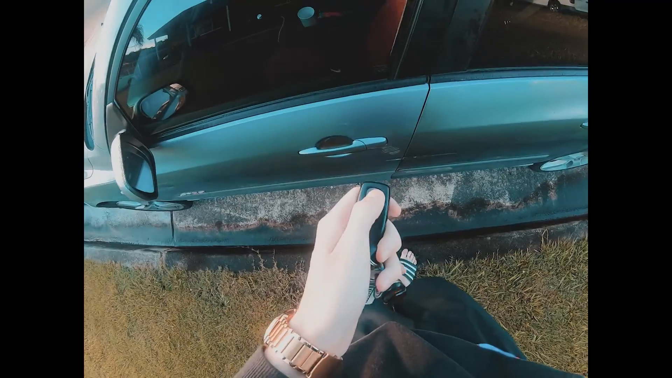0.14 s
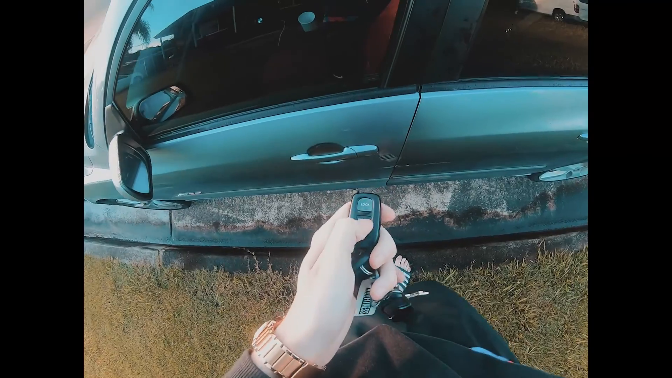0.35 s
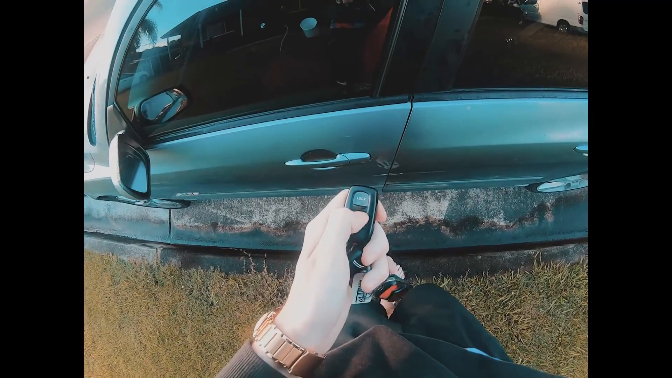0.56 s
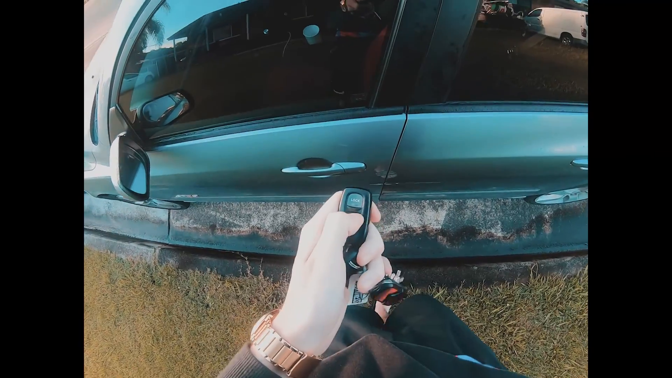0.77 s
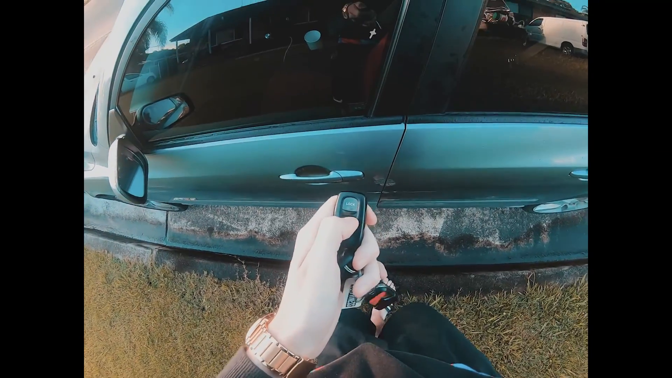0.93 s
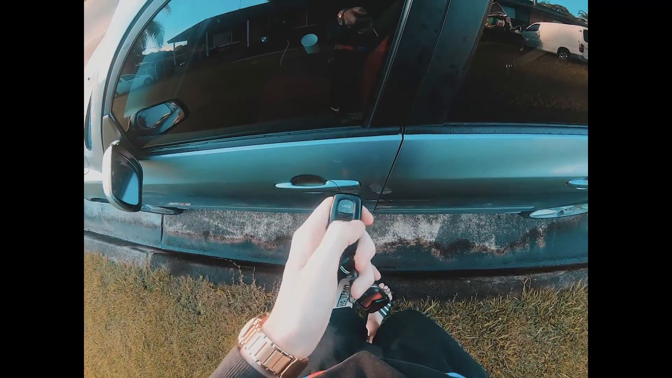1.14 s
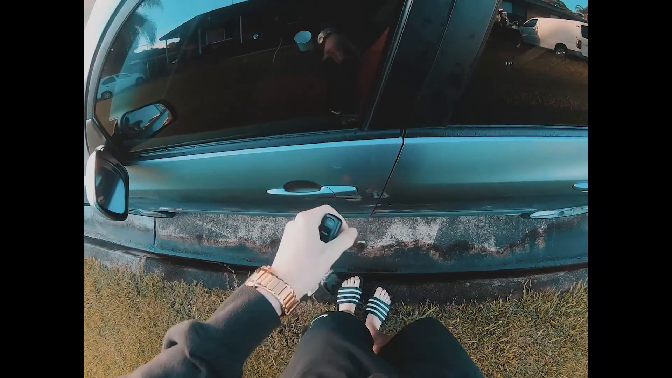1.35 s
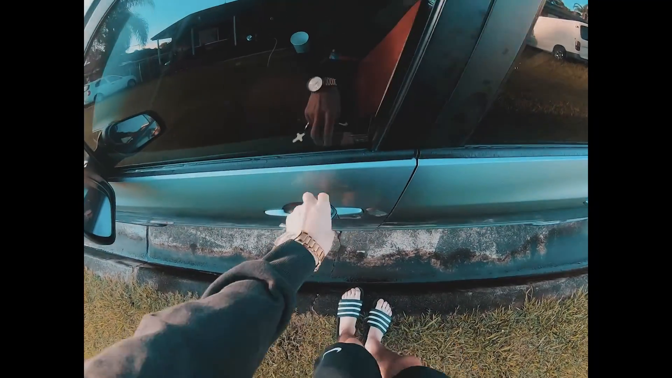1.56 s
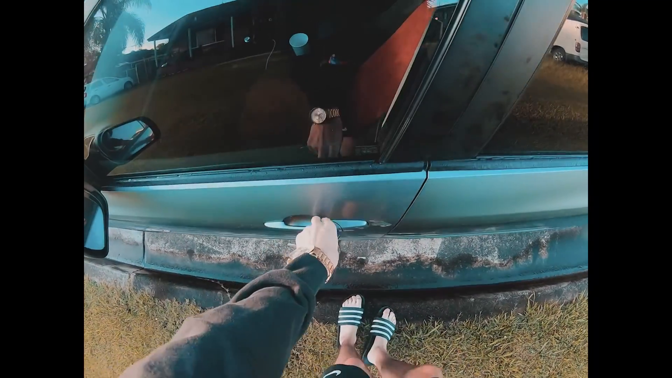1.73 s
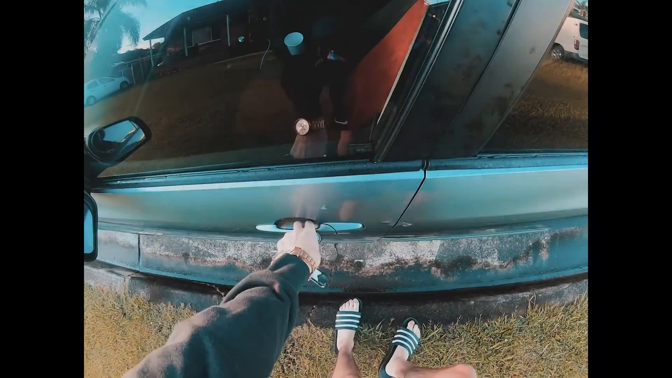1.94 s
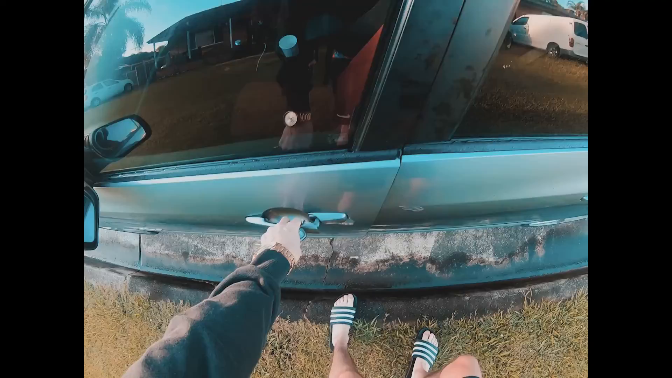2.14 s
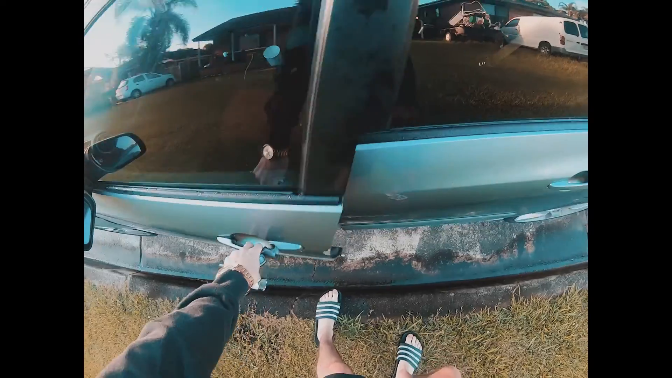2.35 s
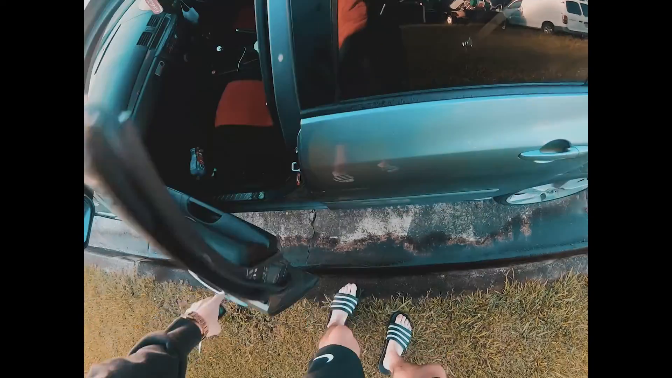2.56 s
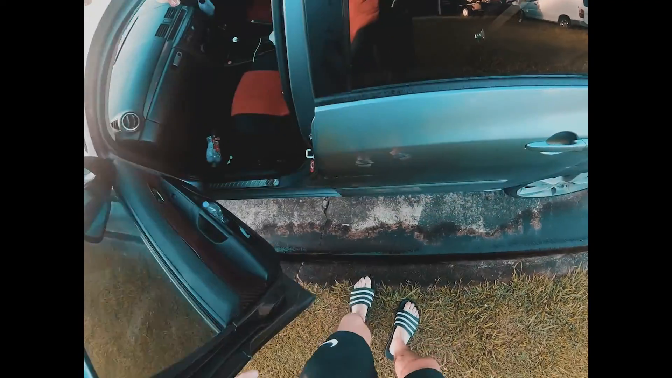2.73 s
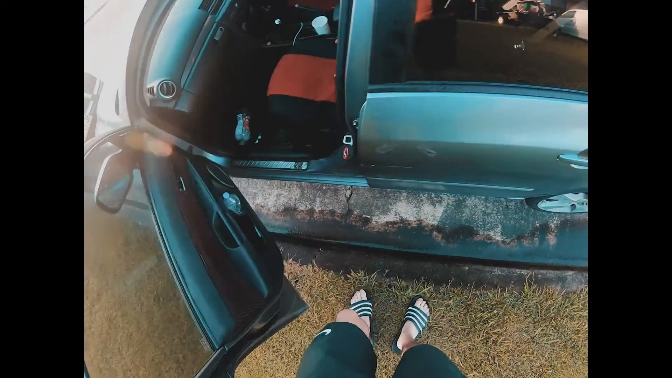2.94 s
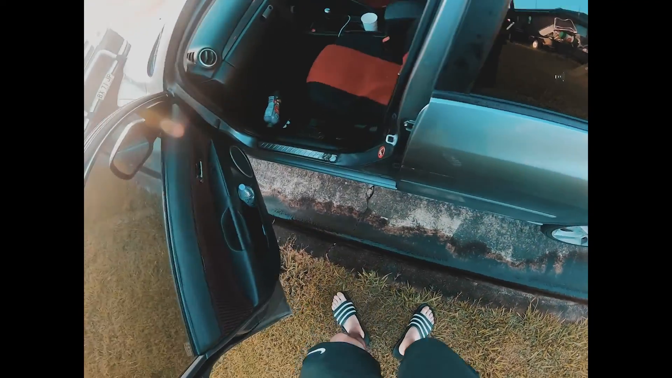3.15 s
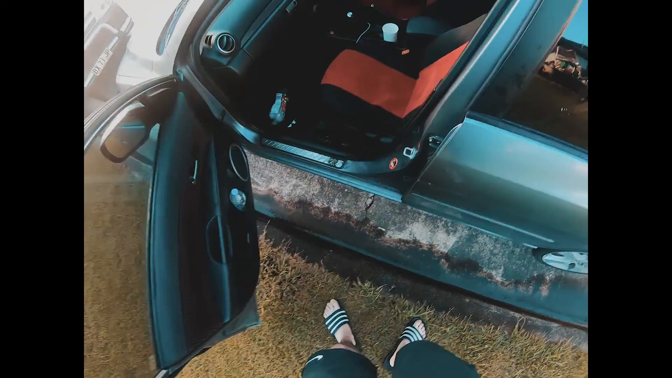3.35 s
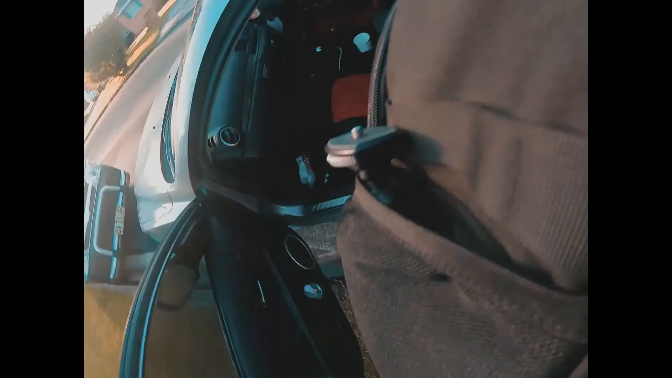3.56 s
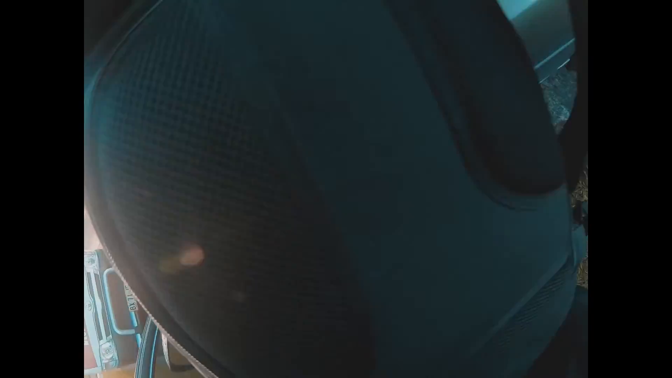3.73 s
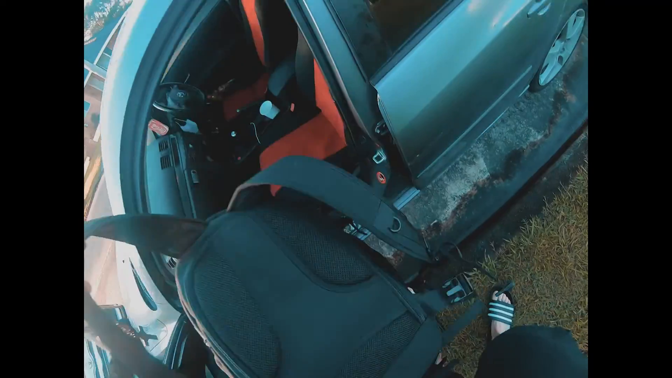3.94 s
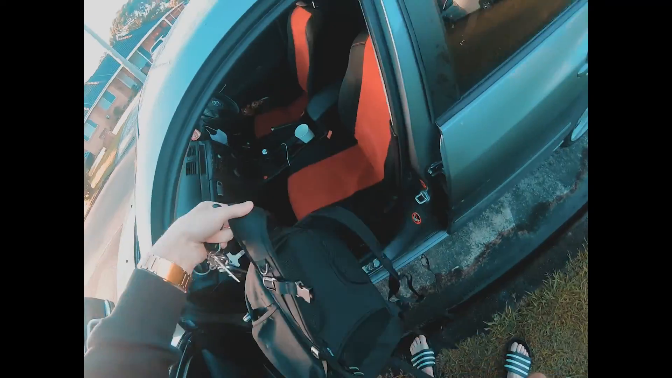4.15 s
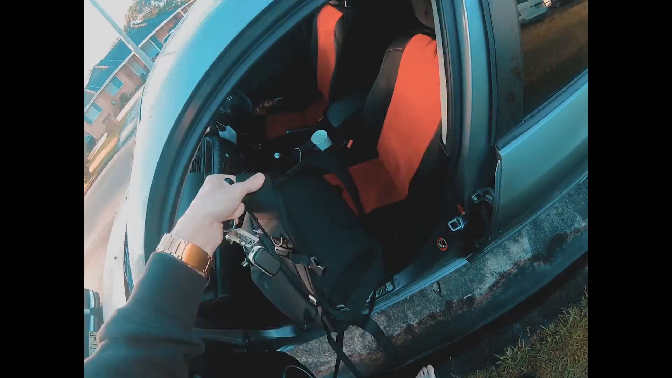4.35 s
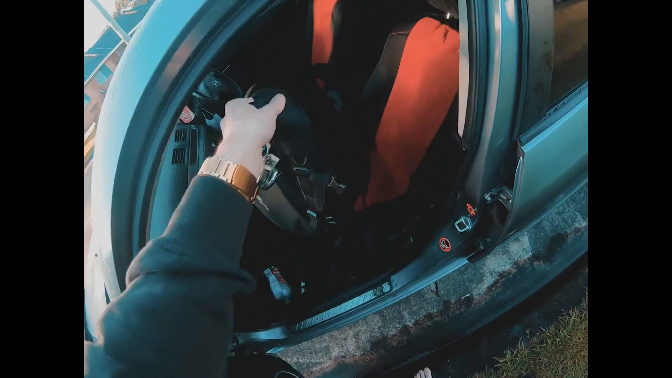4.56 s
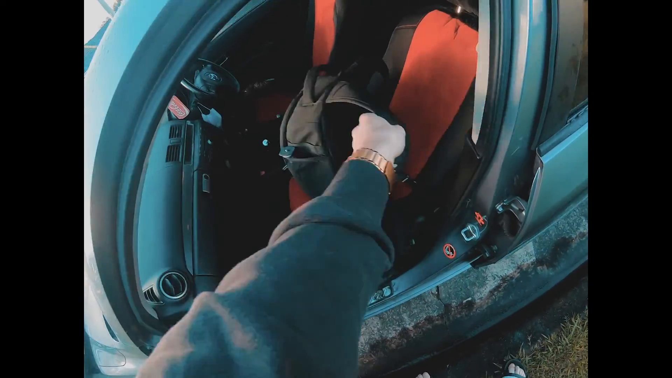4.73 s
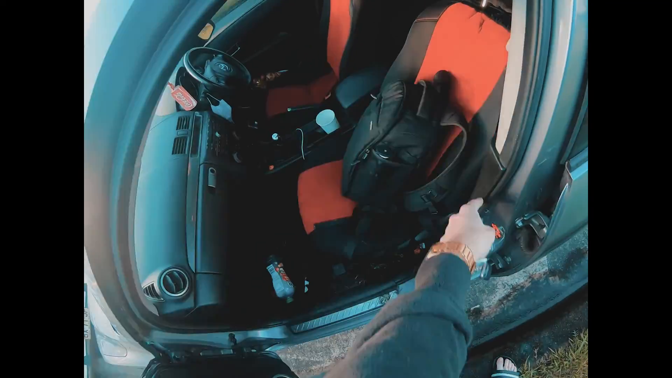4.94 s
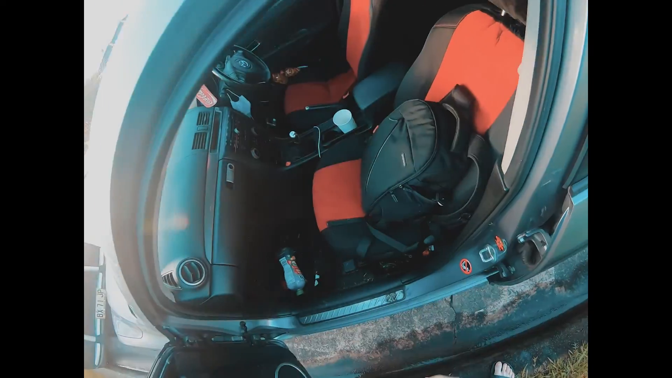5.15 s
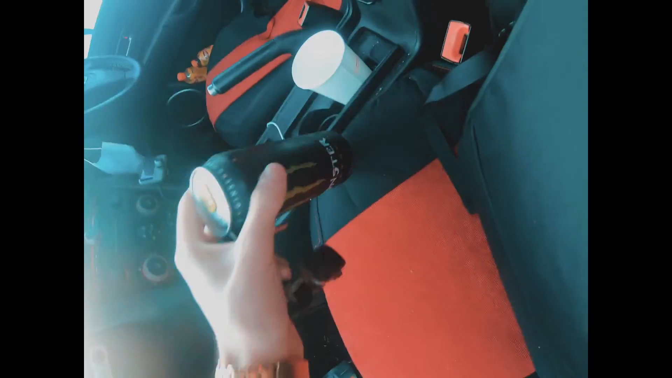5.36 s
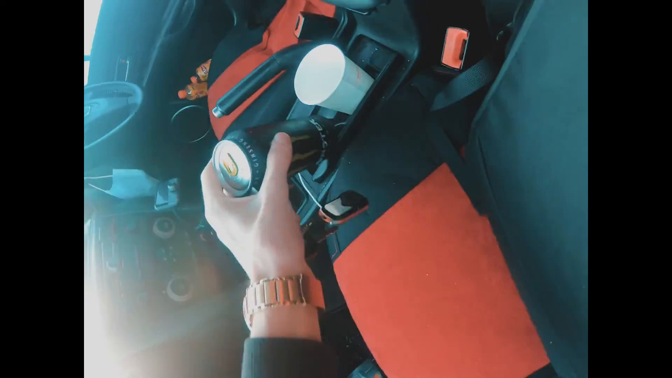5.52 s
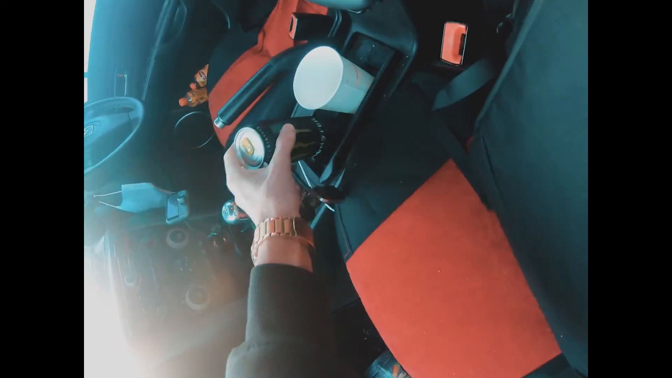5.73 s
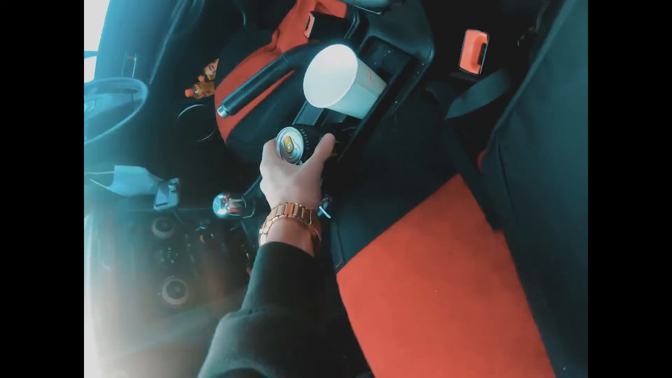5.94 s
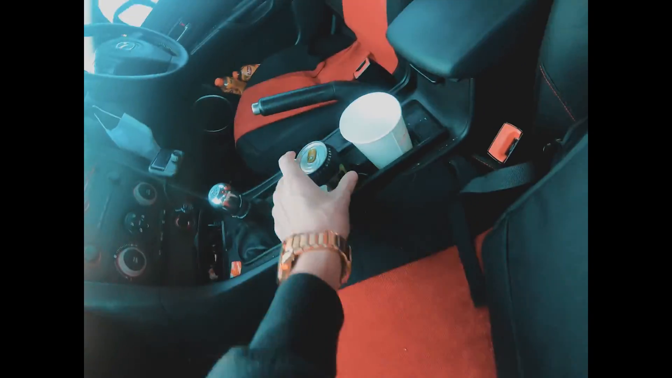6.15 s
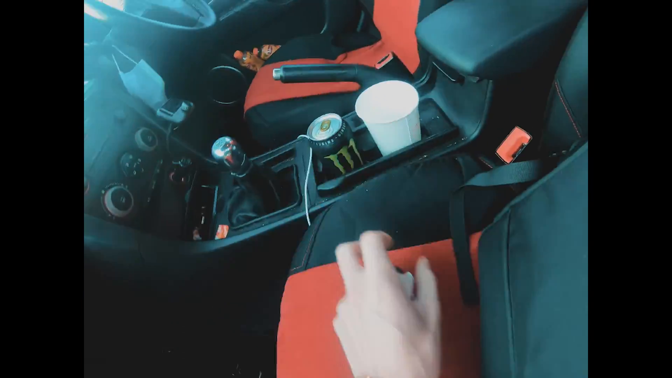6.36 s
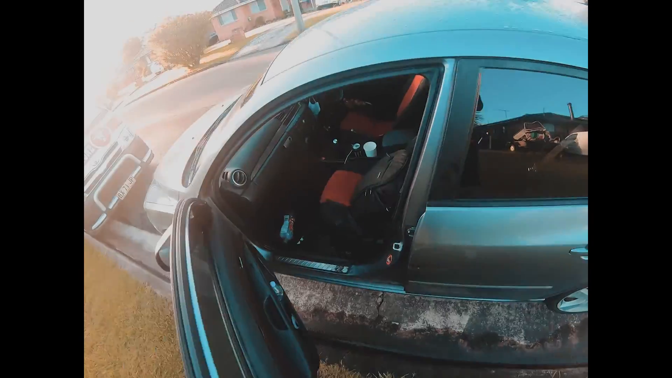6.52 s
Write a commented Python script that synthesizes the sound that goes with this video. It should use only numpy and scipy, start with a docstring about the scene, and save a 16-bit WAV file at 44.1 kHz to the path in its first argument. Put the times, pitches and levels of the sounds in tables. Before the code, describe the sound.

A car unlocks and its door opens with hollow knocks and sharp clicks, then a rucksack lands and a can rattles into its holder.

```python
"""A parked car's door: lock whirrs, handle and latch knock, door swings to its stop; modes of a hollow body.
A rucksack lands on the seat and a can in its holder: ringing modes, bumps, grinding noise bands.
Keys tick (short noise bursts) and cloth rustles (coloured noise, creases) near two head-worn microphones.
Far off a hoarse call falls in pitch (rattled glide), birds chirp (blurred bends), traffic hums (slow noise).
"""
import sys
import numpy as np
from scipy import signal
from scipy.fft import rfft, irfft, next_fast_len
from scipy.io import wavfile
from scipy.ndimage import uniform_filter1d

SR = 44100
rng = np.random.default_rng(int(sys.argv[2]) if len(sys.argv) > 2 else 0)


def pcm_store(signal):
    """Save signal as 16-bit PCM."""
    levels = np.round(np.clip(np.atleast_2d(signal), -1, 1) * 32767)
    wavfile.write(sys.argv[1], SR, levels.astype(np.int16).T)


N = 295029

# knocks of handle, latch, door stop, bag on the sill:
# [t/s, level/dB, ring f/Hz, thud re level/dB, treble re level/dB, thud centre f/Hz]
DOOR_KNOCKS = [(1.755, -39.5, 1180, 5, -31, 314), (1.93, -24, 2040, -7, -11, 400),
               (2.048, -17, 950, -7.5, -14.5, 140), (2.202, -16.5, 3900, -17, -7, 227),
               (2.260, -27.5, 700, 15, -40, 180), (2.356, -21.5, 900, -11.5, -42, 414),
               (2.72, -13.5, 1510, -6, -9.5, 135), (2.915, -12.5, 1410, -13.5, -4.5, 290),
               (5.178, -14, 1026, -30, -12, 604), (5.372, -32, 1380, -3, -7.5, 288)]
# door body modes: [f/Hz]
DOOR_MODES_HZ = [80, 114, 135, 190, 235, 294, 400, 590, 781, 1050, 1350, 1900, 2842, 3542]


def door():
    """Struck door: long-ringing low modes, fading faster with pitch."""
    return knocks(DOOR_KNOCKS, DOOR_MODES_HZ, ring_s=0.34, ring_slope=0.44, crack_db=1.0, rough=1.0,
                  crack_t60=0.048, pan_db=-0.38, thud_db=0., clank_db=-6.0,
                  tail_db=-10.0, tail_hz=2090.0, swell_s=0.0015)


# knocks of the can in its holder:
# [t/s, level/dB, ring f/Hz, thud re level/dB, treble re level/dB, thud centre f/Hz]
CAN_KNOCKS = [(5.910, -15.5, 1130, -1, -19, 274), (5.942, -12.5, 770, -7, -42, 188),
              (5.969, -26.5, 940, 7, -17, 109), (6.036, -14.5, 1880, -6, -33, 318),
              (6.044, -12, 860, 0, -20, 303), (6.072, -23, 4080, 4, -1, 72.7),
              (6.118, -18.5, 3400, -0.5, -28, 285), (6.155, -13.5, 1220, -2, -20, 106),
              (6.283, -31.5, 1105, 10.5, -20, 284), (6.3015, -16.5, 1260, -24, -12, 124),
              (6.329, -14, 4200, -13, -18, 71), (6.408, -7, 3280, -24, -16, 96)]
# console body modes: [f/Hz]
CONSOLE_MODES_HZ = [70, 128, 185, 290, 538, 775, 900, 1340, 1760, 2060, 2420, 3100, 3520, 4300]


def can():
    """Can on the console: modes ring shorter and swell faster than the door's."""
    return knocks(CAN_KNOCKS, CONSOLE_MODES_HZ, ring_s=0.14, ring_slope=0.29, crack_db=-2.5, rough=0.73,
                  crack_t60=0.046, pan_db=0.3, thud_db=0.25, clank_db=-5.0,
                  tail_db=-12.5, tail_hz=4040.0, swell_s=0.00065)


def knocks(rows, modes, ring_s, ring_slope, crack_db, rough, crack_t60, pan_db,
           thud_db, clank_db, tail_db, tail_hz, swell_s):
    """Hollow body: the spot struck favours low modes near the thud, high ones near the ring; ring_s at 100 Hz."""
    out, t = np.zeros((2, N)), np.arange(int(.3 * SR)) / SR
    f = np.array(modes)[:, None]
    fade_db = -60 * t / ring_s * (f / 100) ** ring_slope
    for s, peak_db, ring_hz, low_db, _, centre_hz in rows:
        sign, detune, level = rng.standard_normal((3, len(modes), 1))
        ports_db = 0.64 * rng.standard_normal((2, len(modes), 1))  # each port its own mix
        # loose trim roughens each ring
        buzz = uniform_filter1d(rng.standard_normal((len(modes), len(t))), int(0.0036 * SR))
        roughness = 1 + rough * np.tanh(f / 400) * unit(buzz)
        tones = np.sin(2 * np.pi * f * (1 + 0.025 * detune) * t)
        rings = np.sign(sign) * roughness * undb(fade_db + ports_db) * tones
        thud, clank = (centre_hz, -11, low_db + thud_db), (ring_hz, -7., clank_db)
        for hz, db_per_octave, db in (thud, clank):
            mode_db = db_per_octave * np.abs(np.log2(f / hz)) + 4.1 * level
            body = np.sum(rings * undb(mode_db), axis=1) * (1 - np.exp(-t / swell_s))
            add(out, s, undb(peak_db + db) * body / np.abs(body).max(), pan_db)
    cracks = [(s, peak_db, hz, high_db, crack_t60) for s, peak_db, hz, _, high_db, _ in rows]
    return out + blows(cracks, pan_db, crack_hz=1300.0, crack_db=crack_db, ring_db=-3.5, ring_width=1.254,
                       air_db=2.7, tail_db=tail_db, tail_hz=tail_hz)


# lock motor, door seal, door stop, bag against the chest, bag on the seat, can in its holder:
# [t/s, rise/s, hold/s, fall/s, grind level/dB, bass re grind/dB, treble re grind/dB, bass centre f/Hz]
RUBS = [(1.095, 0.008, 0.035, 0.11, -30.5, 1.5, -8, 221), (2.239, 0.031, 0.02, 0.072, -25, 6, -9.5, 133),
        (2.673, 0.032, 0.024, 0.084, -31.5, 5, -5.5, 134), (3.517, 0.085, 0.027, 0.11, -35, 14.5, 12.5, 70),
        (4.944, 0.01, 0.058, 0.07, -40.5, 13, -3.5, 91), (6.284, 0.0094, 0.11, 0.081, -55.5, 8, 14.5, 150)]
# bass colour: [f/Hz, relative density/dB]
THUMP = [(18, -5.5), (60, -8), (220, -10.5), (450, -15)]
# middle colour: [f/Hz, relative density/dB]
GRIND = [(200, -41), (400, 3.5), (1000, -3), (2500, -15), (3500, -10.5)]
RUB_EDGE_DB = -17.5  # level at both ends, at stretch 1
GRIND_STRETCH, BASS_STRETCH, TREBLE_STRETCH = 0.81, 1.18, 0.47  # slope length, relative


def rubs():
    """Short grinding drags: grainy middle, thumping bass, scratchy top."""
    bass = hiss(THUMP, 3., 50)
    grind = hiss(GRIND, 4.8, 400)
    top = unit(hiss(CLOTH, 1.33, 700) + undb(-8.5) * hiss(TOP, 1.4, 700))
    out, t = 0, np.arange(N) / SR
    for s, rise, hold, fall, db, bass_db, top_db, bass_hz in RUBS:
        sos = signal.butter(1, [bass_hz / 1.75, bass_hz * 1.65], "bandpass", fs=SR, output="sos")
        thump = signal.sosfilt(sos, bass)
        slope = np.maximum(np.maximum(s + rise - t, 0) / rise, (t - s - rise - hold) / fall)

        def shape(stretch):
            return undb(RUB_EDGE_DB * slope / stretch) * (t > s)

        drag = shape(GRIND_STRETCH) * grind
        drag = drag + undb(bass_db) * shape(BASS_STRETCH) * thump
        drag = drag + undb(top_db) * shape(TREBLE_STRETCH) * top
        out = out + undb(db) * drag
    return out


# dull bumps of the bag's load: [t/s, level/dB, f/Hz]
BUMPS = [(4.447, -36.5, 477), (4.582, -32, 320), (4.606, -37, 644), (4.765, -39, 600), (5.254, -31.5, 343)]
BUMP_T60_S = 0.039


def bag_bumps():
    """Bag load: heavily damped single modes."""
    return pings([(*row, BUMP_T60_S) for row in BUMPS], .4)


# small dry clicks of keys, buckles, straps, and the latch's quick sub-hits: [t/s, level/dB, ring f/Hz, treble
# re level/dB]
TICKS = [(0.149, -20, 1660, -21), (0.8503, -20, 1770, -25), (1.0315, -27.5, 4000, -10.5),
         (1.212, -31.5, 3650, -11), (1.342, -31.5, 1840, -20), (1.379, -35.5, 4540, -9),
         (1.427, -39, 2290, -5), (1.4754, -26, 3800, -3.5), (1.716, -38, 3400, -1.5),
         (1.8466, -21, 2040, -27), (1.8823, -35, 1560, -6), (1.8975, -23.5, 3560, -21),
         (2.269, -18.5, 3540, -29), (2.294, -14.5, 3070, -19), (2.308, -17.5, 3460, -15),
         (2.976, -22.5, 3630, -5.5), (3.237, -28.5, 1390, -5.5), (3.449, -33.5, 3300, 4.5),
         (3.5243, -26, 3720, -3), (3.6491, -17.5, 1330, 1), (3.6691, -11, 3040, -2),
         (3.685, -14.5, 3300, 7.5), (3.7153, -18.5, 3640, -19), (3.7276, 4.5, 3710, -8),
         (4.2303, -28, 3300, -9), (4.2538, -27, 3370, -13), (4.334, -29, 1810, -2),
         (4.386, -26.5, 3560, -10), (4.4032, -27, 1550, 0), (4.504, -30, 3420, -14),
         (4.559, -29.5, 2700, -14), (4.7302, -25.5, 3740, -12), (4.8863, -26.5, 3800, -2.5),
         (4.9522, -25, 1630, -6), (5.0425, -23, 3700, -2.5), (5.116, -22, 2030, 7.5),
         (5.2988, -26, 3030, -9.5), (5.053, -30, 2920, -18), (5.4204, -29.5, 4916, -25),
         (6.149, -21.5, 1790, -6.5), (6.325, -17, 1140, -28), (6.471, -21, 1850, -13.5)]
TICK_T60_S, DOUBLING_DB = 0.0068, 12  # ring time at 0 dB; doubles for each step softer


def ticks():
    """Dry clicks; the softer, the longer the ring."""
    clicks = [(*row, TICK_T60_S * 2 ** (-row[1] / DOUBLING_DB)) for row in TICKS]
    return blows(clicks, pan_db=0.73, crack_hz=1310.0, crack_db=-1.0, ring_db=-2.14, ring_width=1.12,
                 air_db=3.76, tail_db=-10.5, tail_hz=4600.0)


# thin metal rings after some clicks: [t/s, level/dB, f/Hz, t60/s]
JINGLES = [(3.526, -20.5, 7580, 0.047), (3.687, -29.5, 7600, 0.067), (6.479, -45.5, 1093, 0.41)]


def jingles():
    """Thin metal: single decaying modes, port phases scattered."""
    return pings(JINGLES, 4.2)


# swishes of sleeve and bag, rise and fall over 20 dB:
# [height t/s, level/dB, rise/s, fall/s, creases re hiss/dB]
SWISHES = [(.7, -55.5, 2.5, 1.5, -6.5), (1.55, -54.5, 0.74, 0.24, 1.5), (2.0, -51.5, 0.86, 0.54, -3),
           (2.49, -44, 0.08, 0.8, -12.5), (2.66, -40, 0.65, 0.27, -15), (3.451, -50.5, 0.95, 0.33, -2.5),
           (3.951, -56, 0.18, 0.099, -2), (4.551, -54, 0.45, 4.1, 1), (4.92, -41.5, 0.64, 0.7, -2),
           (6.69, -48, 0.16, .2, -14)]
# cloth colour: [f/Hz, relative density/dB]
CLOTH = [(500, -22.5), (700, -17), (1130, -22.5), (1900, -12), (2900, -14.5), (3790, -9.5), (4620, -16),
         (6500, -31.5)]
# treble colour: [f/Hz, relative density/dB]
TOP = [(4000, -24), (5500, -5.5), (9500, -7), (12000, -20), (16000, -34.5)]
# narrow hiss colour: [f/Hz, relative density/dB]
NAP = [(3100, -14), (3850, 0), (4700, -14)]
STILL_DB = -12  # cloth at rest re traffic


def cloth():
    """Rubbing weave: grainy hiss, a narrow hiss swelling on its own, snapping creases."""
    traffic_db, _ = curves(HUM)
    t = np.arange(N) / SR
    swish, stiff = 0, 0  # powers of hiss and creases
    for s, db, rise, fall, crease_db in SWISHES:
        swell = undb(db - 20 * np.maximum((s - t) / rise, (t - s) / fall)) ** 2
        swish = swish + swell
        stiff = stiff + undb(crease_db) ** 2 * swell
    weave = hiss(CLOTH, 2.6, 600) + undb(-10.5) * hiss(TOP, 1.3, 300)
    creases = crumple(90) * (hiss(CLOTH) + undb(-9.5) * hiss(TOP))
    nap = undb(-4.0 + 2.9 * walk(24)) * hiss(NAP, 3.7, 500)
    level = np.sqrt(swish + undb(traffic_db + STILL_DB) ** 2)
    return level * (undb(2.8 * walk(25)) * weave + nap) + np.sqrt(stiff) * creases


def crumple(per_s):
    """Lone creases snap at random, mostly faint; envelope decays over a few ms."""
    creases = (rng.random(N) < per_s / SR) * undb(5.4 * rng.standard_normal(N))
    return signal.lfilter([1], [1, -np.exp(-1 / (0.004 * SR))], creases)


# phrases: [t/s, length/s, start f/Hz, end f/Hz, bend of the fall (exponent), level/dB]
PHRASES = [(-.12, 0.53, 1245, 927, 1.3, -39.5), (0.217, .6, 1127, 917, 2.6, -39.5)]
RATTLE_HZ, RATTLE, SWELL = 104.4, 0.76, 0.74  # throat rattle rate, depth 0-1; swell exponent


def far_call():
    """Hoarse falling glides, throat-rattled; a decaying diffuse echo differs per port."""
    out = 0
    echo_t = np.arange(int(.1 * SR)) / SR
    echoes = rng.standard_normal((2, len(echo_t))) * undb(-60 * echo_t / 0.33)
    echoes /= np.sqrt(np.sum(echoes ** 2, axis=1))[:, None]
    for s, length, hz0, hz1, bend, db in PHRASES:
        u = np.clip((np.arange(N) / SR - s) / length, 0, 1)
        glide_hz = (hz0 + (hz1 - hz0) * u ** bend) * (1 + 0.0031 * walk(80.5))
        phase = 2 * np.pi * np.cumsum(glide_hz) / SR
        hoarse = 1 + .55 * (walk(160) + 1j * walk(160))
        rattle_phase = 2 * np.pi * np.cumsum(RATTLE_HZ * (1 + 0.058 * walk(28.8))) / SR
        rattle = 1 + RATTLE * np.cos(rattle_phase)
        swell = np.abs(np.sin(np.pi * u)) ** SWELL * (u < 1)
        voice = unit(np.real(hoarse * rattle * np.exp(1j * phase))) * undb(db) * swell
        wet = signal.fftconvolve(voice[None], echoes, axes=1)[:, :N]
        out = out + 0.39 * voice + 0.62 * wet
    return out


# notes: [start t/s, end t/s, start f/Hz, middle f/Hz, end f/Hz, level/dB, hoarse width/Hz]
BIRDS = [(0.034, 0.236, 4310, 4180, 4060, -54.5, 340), (0.213, 0.345, 3380, 3330, 3190, -60.5, 452),
         (0.239, 0.602, 3964, 3880, 3690, -62, 325), (.3, 0.33, 6000, 5300, 4870, -63, 60),
         (0.603, 0.65, 5860, 5140, 4480, -59, 60), (0.738, 0.931, 3690, 3560, 3380, -57, 517),
         (1.057, 1.08, 4070, 4000, 3950, -51, 40), (1.11, 1.15, 3740, 3640, 3720, -38.5, 40),
         (1.222, 1.25, 3650, 3480, 3050, -47, 40), (1.25, 1.294, 2590, 2630, 2320, -42.5, 87),
         (.2, .39, 4420, 4380, 4300, -59.5, 201), (3.322, 3.381, 3550, 3960, 3930, -42.5, 60),
         (3.33, 3.387, 4640, 5000, 4900, -52, 60), (3.418, 3.461, 4050, 4300, 3950, -45, 60),
         (3.466, 3.53, 3800, 3950, 3750, -51, 79), (3.455, 3.522, 5250, 5750, 5100, -61.5, 450)]


def birds():
    """Notes bend through three pitches; fast random level and phase blur each into a narrow band."""
    out = np.zeros((2, N))
    for s0, s1, hz0, hz1, hz2, db, width_hz in BIRDS:
        u = np.linspace(0, 1, int((s1 - s0) * SR))
        bend_hz = np.polyval(np.polyfit([0, .5, 1], [hz0, hz1, hz2], 2), u)
        blur = [1 + width_hz / 150 * (walk(width_hz) + 1j * walk(width_hz)) for _ in range(2)]
        blur = np.array(blur)[:, :len(u)]
        tone = np.real(blur * np.exp(2j * np.pi * np.cumsum(bend_hz) / SR))
        add(out, s0, undb(db) * np.sin(np.pi * u ** 0.81) ** 0.23 * tone, -1.)
    return out


# background, muffled while the bag covers the ports and inside the car:
# [t/s, traffic level/dB, bass rumble level/dB]
HUM = [(0, -55.5, -49), (1.4, -55.5, -45.5), (2.5, -54, -48.5), (2.68, -51, -38), (3.05, -58, -44),
       (3.49, -58.5, -54), (3.8, -65.5, -41.5), (4.1, -71, -59), (4.6, -56, -60), (5.15, -51.5, -46),
       (5.47, -65, -57), (5.85, -65.5, -67), (5.99, -48, -44), (6.24, -51, -35.5), (6.42, -62, -51.5),
       (6.69, -52.5, -46)]
# traffic colour: [f/Hz, relative density/dB]
TRAFFIC = [(150, -8), (409, -13), (477, -17), (817, -14.5), (1500, -14), (2000, -26)]
# rumble colour: [f/Hz, relative density/dB]
RUMBLE = [(15, -17.5), (70, -3.5), (125, -6), (230, -5.5), (420, -13.5)]
DRONE_DB = 4  # upper rumble re traffic


def traffic():
    """Distant traffic noise over a rumble; its bass is lumpy, levels wander."""
    traffic_db, bass_db = curves(HUM)
    rumble = hiss(RUMBLE)
    lumps = signal.sosfiltfilt(signal.butter(3, 150., fs=SR, output="sos"), rumble)
    drone = undb(DRONE_DB + 2.9 * walk(9)) * (rumble - lumps)
    far = undb(0.62 * walk(26)) * hiss(TRAFFIC) + drone
    lump_db = bass_db + 2.44 * walk(7.8) + 0.73 * walk(34)
    return undb(traffic_db) * far + undb(lump_db) * lumps


def undb(db):
    """dB to amplitude ratio."""
    return 10 ** (np.asarray(db) / 20)


def unit(x):
    """Scales to RMS 1."""
    return x / np.sqrt(np.mean(x ** 2))


def on_log(points, hz):
    """Reads (f/Hz, value) points on a log axis."""
    p = np.array(points)
    return np.interp(np.log(np.maximum(hz, 1)), np.log(p[:, 0]), p[:, 1])


def curves(rows):
    """Table columns joined in time, one value a sample."""
    s, *columns = np.transpose(rows)
    return [np.interp(np.arange(N) / SR, s, c) for c in columns]


def walk(rate_hz):
    """Random levels, slewed from one to the next each 1 / rate_hz s; spread near 1."""
    k = int(SR / rate_hz)
    return uniform_filter1d(np.repeat(rng.standard_normal(N // k + 1), k), k)[:N]


# port likeness: [f/Hz, left-right correlation]
LIKENESS = [(30, 0.89), (200, 1), (600, 0.85), (1200, 0.44), (2500, 1), (5000, 1), (12000, 0.073)]


def hiss(points, grain_db=0., per_s=900):
    """Coloured two-port noise of RMS 1, correlated by frequency; grains make it crackle."""
    size = next_fast_len(N)
    hz = np.arange(size // 2 + 1) * SR / size
    gain = undb(on_log(points, hz)) * (hz > points[0][0]) * (hz < points[-1][0])
    alike = np.clip(on_log(LIKENESS, hz), 0, 1)
    grains = undb(grain_db * walk(per_s))
    spectra = rfft(rng.standard_normal((2, N)) * grains, size)
    mid, side = spectra * gain * np.sqrt([1 + alike, 1 - alike])
    return unit(irfft([mid + side, mid - side], size)[:, :N])


# instants where added knocks, rings and notes stop short: [t/s]
CUTS_S = [5.9, 6.478]


def add(out, s, sound, pan_db):
    """Lays a sound into two ports, left up by pan_db; ends it at the next cut."""
    i = int(s * SR)
    n = min([sound.shape[1], N - i] + [int(cut * SR) - i for cut in CUTS_S if cut > s])
    out[:, i:i + n] += sound[:, :n] * undb([[pan_db / 2], [-pan_db / 2]])


def burst(t, lo_hz, hi_hz, t60, spread, snap=0.):
    """Decaying noise band of peak 1, led by a snap, partly different at the two ports."""
    noise = rng.standard_normal((3, len(t)))
    noise[0, 0] += snap
    noise = (noise[0] + spread * noise[1:]) * undb(-60 * t / t60)
    sos = signal.butter(2, [lo_hz, min(hi_hz, 20000)], "bandpass", fs=SR, output="sos")
    band = signal.sosfilt(sos, noise)
    return band / np.abs(band).max()


def blows(rows, pan_db, crack_hz, crack_db, ring_db, ring_width, air_db, tail_db, tail_hz):
    """Each blow: broad crack, ring at its own pitch, treble tick, scattered tail."""
    out, t = np.zeros((2, N)), np.arange(int(.3 * SR)) / SR
    for s, peak_db, hz, high_db, t60 in rows:
        t60 = np.clip(t60, .004, .2)
        crack = burst(t, crack_hz, 3920, 0.78 * t60, 0.52, 7.7)
        ring = burst(t, hz / ring_width, hz * ring_width, t60, 0.033, 4.6)
        tail = burst(t, tail_hz / 4, tail_hz, 3 * t60, 1.0)
        air = burst(t, 6260, 10400, 1.17 * t60, 3.4, 26.4)
        sound = undb(crack_db) * crack + undb(ring_db) * ring
        sound = sound + undb(tail_db) * tail + undb(high_db + air_db) * air
        add(out, s, undb(peak_db) * sound * (1 - np.exp(-t / 0.00013)), pan_db)
    return out


def pings(rows, skew_rad):
    """Single decaying modes; port phases random up to skew_rad."""
    out, t = np.zeros((2, N)), np.arange(int(.4 * SR)) / SR
    for s, db, hz, t60 in rows:
        tone = np.sin(2 * np.pi * hz * t + skew_rad * rng.random((2, 1)))
        add(out, s, undb(db - 60 * t / t60) * tone, -2.)
    return out


def duck(x, limit_db=-3.5, depth_db=11.5, hold_s=0.042, back_db_per_s=81.5):
    """Gain control above the bass: a peak over the limit cuts gain a moment later; holds, creeps back."""
    hit = np.where(np.abs(x).max(axis=0) > undb(limit_db), depth_db, -np.inf)
    ramp = back_db_per_s * np.arange(N) / SR
    down_db = np.maximum.accumulate(hit + ramp) - ramp + back_db_per_s * hold_s
    down_db = np.clip(down_db, 0, depth_db)
    late = int(.008 * SR)
    bass = signal.sosfiltfilt(signal.butter(2, 140, fs=SR, output="sos"), x)
    return bass + (x - bass) * undb(-uniform_filter1d(np.roll(down_db, late), late))


def scene():
    """Sums all sources; cloth and traffic lean right."""
    near = door() + can() + rubs() + bag_bumps() + ticks() + jingles()
    bed = (cloth() + traffic()) * undb([[-.9], [.9]])
    return near + bed + far_call() + birds()


PORT_LAG_SAMPLES, TOP_HZ, CLIP = 2, 16400, .82


def record(dry):
    """Left port lies a little further from the sources; gain ducks, peaks clip, the top is cut."""
    ports = duck(np.array([np.roll(dry[0], PORT_LAG_SAMPLES), dry[1]]))
    lowpass = signal.ellip(10, .2, 100, TOP_HZ, fs=SR, output="sos")
    return signal.sosfilt(lowpass, np.clip(ports, -CLIP, CLIP))


dry = scene()
out = record(dry)
pcm_store(out)
```